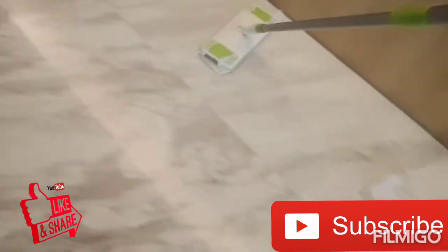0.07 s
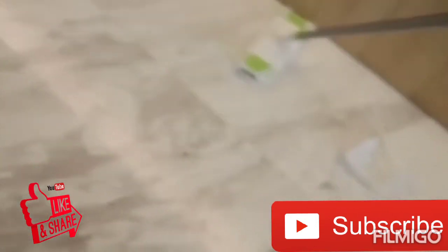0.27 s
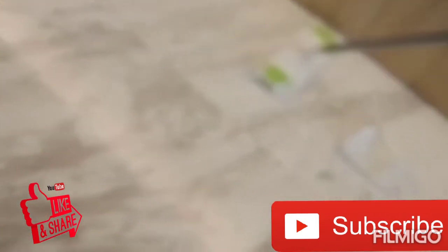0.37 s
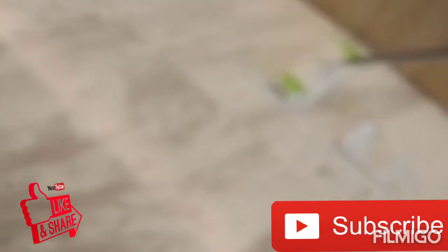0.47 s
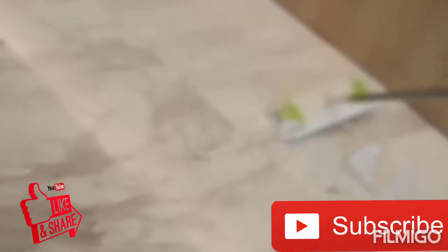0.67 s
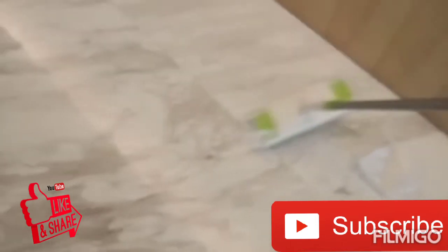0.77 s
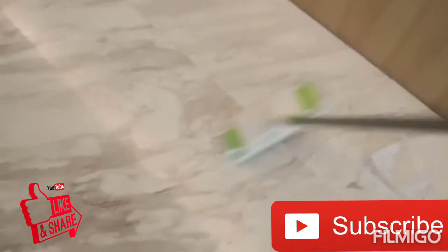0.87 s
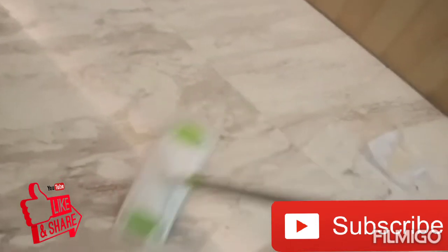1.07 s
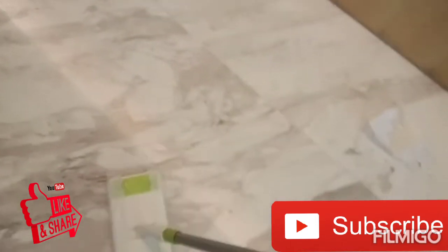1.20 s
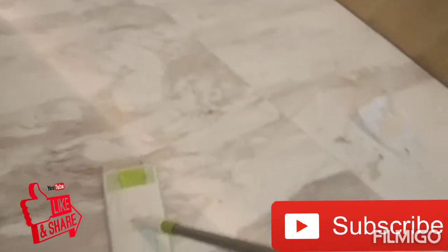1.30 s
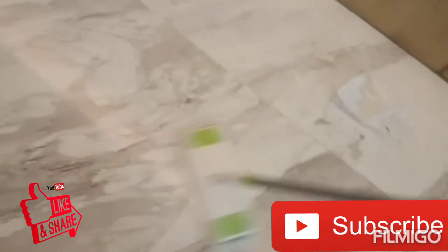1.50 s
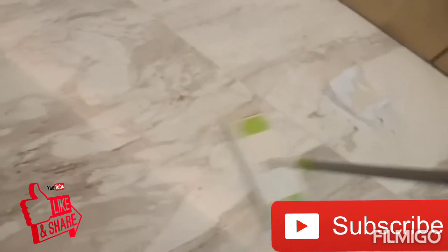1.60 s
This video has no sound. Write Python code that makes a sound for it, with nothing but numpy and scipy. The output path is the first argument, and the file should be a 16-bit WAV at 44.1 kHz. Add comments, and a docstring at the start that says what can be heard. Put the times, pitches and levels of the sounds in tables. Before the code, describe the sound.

Flat mop knocking on a hard floor, with plastic clacks, a quick rattle and faint swishes.

```python
"""Thuds and plastic clacks of a flat mop on a hard floor in a small room.
The padded head thuds down, the plate clacks, the swivel joint ticks and the pole taps against it;
then the head flips and lands in a quick rattle. The cloth swishes faintly between the knocks.
The room rings after each blow and hums with steady noise."""
import sys
import numpy as np
from scipy import signal
from scipy.fft import rfft, irfft, next_fast_len
from scipy.io import wavfile
from scipy.ndimage import uniform_filter1d

SR = 44100
rng = np.random.default_rng(int(sys.argv[2]) if len(sys.argv) > 2 else 0)


def dump_mix(stems):
    """Bounce the given channels to the path in sys.argv[1] as a 16-bit WAV at rate SR."""
    frames = np.atleast_2d(stems).T  # one column per channel
    limited = np.clip(frames, -1, 1)  # hard clip at full scale
    pcm = np.round(limited * 32767).astype(np.int16)
    wavfile.write(sys.argv[1], SR, pcm)


N = 72765
T = np.arange(N) / SR

# Spectrum of the crack in a clack or tap. Each row: frequency in Hz, relative level in dB.
CRACK_SPECTRUM = [(60, -31), (200, -13.5), (600, 0), (1300, -7), (2600, -1.5), (3500, -2), (4200, -10),
                  (4800, -24), (9000, -25), (16000, -33)]
# Spectrum of the joint's tick. Each row: frequency in Hz, relative level in dB.
TICK_SPECTRUM = [(500, -12), (2000, -8), (4000, 0), (6000, -1.5), (8500, 8), (10500, -12.5), (15500, -14)]
CRACK_T60_S, TICK_T60_S = 0.018, 0.022
TILT_PIVOT_HZ = 2000
RING_WET_DB = -8.5  # share of a part's own ring that reaches the room


def amp(db):
    """Decibels to gain."""
    return 10 ** (np.asarray(db) / 20)


def unit(x):
    """Scale to rms 1."""
    return x / np.sqrt(np.mean(x ** 2) + 1e-20)


def along(points, hz):
    """Read (Hz, value) points on a log axis."""
    points_hz, values = np.transpose(points)
    return np.interp(np.log(hz + 1), np.log(points_hz + 1), values)


def fade(t, t60_s):
    """Exponential decay, 60 dB down at t60_s."""
    return np.exp(-np.log(1000) * t / t60_s)


def colour(x, points):
    """Minimum-phase filter with the given (Hz, dB) gain."""
    size = next_fast_len(2 * len(x))
    gain = amp(along(points, np.fft.rfftfreq(size, 1 / SR)))
    cepstrum = irfft(np.log(gain), size)
    cepstrum[1:size // 2] *= 2
    cepstrum[size // 2 + 1:] = 0
    return irfft(rfft(x, size) * np.exp(rfft(cepstrum)), size)[:len(x)]


def noise(points):
    """Coloured noise of rms 1."""
    return unit(colour(rng.standard_normal(N), points))


def add(track, start_s, sound):
    """Mix a sound in at start_s."""
    i = round(start_s * SR)
    track[i:i + len(sound)] += sound[:N - i]


def burst(points, t60_s, tilt_db_oct=0):
    """Dying puff of coloured, tilted noise that starts near rms 1."""
    envelope = fade(T[:SR // 10], t60_s)
    tilted = [(hz, db + tilt_db_oct * np.log2(hz / TILT_PIVOT_HZ)) for hz, db in points]
    puff = colour(rng.standard_normal(len(envelope)) * envelope, tilted)
    return unit(puff) * np.sqrt(np.mean(envelope ** 2))


def struck(modes, attack_s, tilt_db_oct=0):
    """Short ring of a part's modes; a positive tilt brightens it."""
    t = T[:SR // 10]
    ring = np.zeros(len(t))
    for k, (hz, db, t60_s) in enumerate(modes):
        gain = (-1) ** k * amp(db + tilt_db_oct * np.log2(hz / TILT_PIVOT_HZ))
        ring += gain * np.sin(2 * np.pi * hz * t) * fade(t, t60_s)
    return ring * (1 - np.exp(-t / attack_s)) ** 2


def room_noise():
    """Steady low hum with a little hiss."""
    # Each row: frequency in Hz, relative level in dB.
    hum_spectrum = [(25, -31), (45, -12), (68, -2), (98, 1), (150, -9.5), (210, -7), (290, -8), (450, -17),
                    (700, -16), (1200, -25), (3000, -27.5), (5000, -31.5), (7000, -32), (8500, -25.5),
                    (10000, -38), (12500, -48), (15800, -41.5)]
    return amp(-52.5) * noise(hum_spectrum)


def room_tail(x):
    """Diffuse reverberation; each frequency dies at its own speed."""
    # Room decay. Each row: frequency in Hz, T60 in seconds.
    decay_times = [(100, 0.86), (280, 0.7), (700, 0.99), (2500, 0.66), (5000, 0.68), (12000, 0.45)]
    build_s = 0.001
    hz, t, spectra = signal.stft(rng.standard_normal(SR), SR, nperseg=256)
    spectra *= fade(t, along(decay_times, hz)[:, None])
    tail = signal.istft(spectra, SR, nperseg=256)[1][:SR]
    tail *= 1 - np.exp(-T[:SR] / build_s)
    return signal.fftconvolve(x, tail / np.linalg.norm(tail))[:N]


def room_ring(x):
    """Low room resonances, set off by blows near their pitch."""
    # Each row: frequency in Hz, relative level in dB, T60 in seconds.
    room_modes = [(205.6, -16.5, 0.56), (230.7, -27, 1), (275.4, -15.5, 0.99), (299.7, -19, 0.61),
                  (343, -52, 0.39), (364.4, -26.5, 0.92), (402.7, -33, 0.5), (432.4, -23.5, 0.88),
                  (462.4, -26, 1), (594, -28, 0.36), (595.3, -25.5, 0.99), (633, -24.5, 0.36),
                  (775, -16, 0.83), (856, -24, 0.45)]
    ring = sum(amp(db) * np.cos(2 * np.pi * hz * T) * fade(T, t60_s) for hz, db, t60_s in room_modes)
    return signal.fftconvolve(x, ring / np.linalg.norm(ring))[:N]


def cloth():
    """The pad swishes with a fine grain as it slides."""
    # Course of the slide. Each row: time in seconds, level in dB.
    slide_levels = [(0, -63.5), (.2, -64), (.4, -62.5), (.56, -58), (.62, -57.5), (.69, -59.5),
                    (.79, -55.5), (.87, -65.5), (1.1, -77), (1.2, -76), (1.42, -77), (1.52, -63),
                    (1.62, -59.5)]
    # Cloth friction. Each row: frequency in Hz, relative level in dB.
    swish_spectrum = [(300, -8), (1000, 5), (3000, 7.5), (5000, -7), (7000, 1.5), (8500, 12), (10000, 0.5),
                      (12500, -3), (15800, -3)]
    slide_db = np.interp(T, *np.transpose(slide_levels))
    grain_db = unit(uniform_filter1d(rng.standard_normal(N), size=200))
    return amp(slide_db + grain_db) * noise(swish_spectrum)


def pole():
    """The hollow pole taps its joint: a short pitched ring, a tick, a crack that scatters in the room."""
    # Each row: start in seconds, gain in dB.
    taps = [(.2478, -43.5), (.9184, -33.5)]
    # Each row: frequency in Hz, relative level in dB, T60 in seconds.
    pole_modes = [(656, -6, 0.022), (871, -7.5, 0.074), (1300, -13, 0.016), (1850, -9.5, 0.024),
                  (2398, 0.5, 0.026), (2667, 5, 0.011), (3660, 2.5, 0.016)]
    tick_offset_db, crack_direct_db, crack_wet_db = -18.5, -2, -1
    track = np.zeros(N)
    for start_s, db in taps:
        ring = amp(db) * struck(pole_modes, attack_s=0.00029)
        crack = amp(db) * burst(CRACK_SPECTRUM, CRACK_T60_S)
        tick = amp(db + tick_offset_db) * burst(TICK_SPECTRUM, TICK_T60_S)
        add(track, start_s, ring + amp(crack_direct_db) * crack + tick)
        add(track, start_s, room_tail(amp(RING_WET_DB) * ring + amp(crack_wet_db) * crack))
    return track


def clacks():
    """Plate clacks (crack and short ring) and joint ticks, some following one another within a few ms."""
    # Each row: start in seconds, clack and tick gains in dB, clack and tick tilts in dB per octave.
    contacts = [(0.2483, -49, -39, -0.5, -5), (0.2519, -59, -46, 7, 9), (0.2638, -43, -47, 3, 6.5),
                (.274, -40, -54, -0.5, 14), (0.5658, -39, -48, 0.5, -3), (.585, -45, -65, -4.5, 0),
                (1.1737, -32, -42.5, 0.5, 4), (1.178, -67, -43, 6, 14), (1.2208, -30, -51, -6, 5),
                (1.2283, -26, -35, -3, -11), (1.233, -36.5, -60, -15, -7),
                (1.2405, -37.5, -55, 2, 9), (1.2443, -29, -64, -2.5, -10),
                (1.2471, -26.5, -45, 1.5, -8.5), (1.2495, -24, -28, -3.5, -27),
                (1.2522, -34.5, -66, 1.5, -4), (1.2748, -37, -64, 0, -15)]
    # Each row: frequency in Hz, relative level in dB, T60 in seconds.
    plate_modes = [(593, -15, 0.042), (869, -16.5, 0.09), (1200, -12, 0.017), (1933, -7.5, 0.024),
                   (2500, -5, 0.018), (2890, -11.5, 0.024), (3460, -1.5, 0.019), (4165, -13.5, 0.015)]
    attack_s, ring_offset_db, crack_offset_db = 0.0003, -6.5, -4
    crack_wet_db, tick_wet_db = -4, -2.5
    track = np.zeros(N)
    for start_s, clack_db, tick_db, clack_db_oct, tick_db_oct in contacts:
        ring = amp(clack_db + ring_offset_db) * struck(plate_modes, attack_s, clack_db_oct)
        crack = amp(clack_db + crack_offset_db) * burst(CRACK_SPECTRUM, CRACK_T60_S, clack_db_oct)
        tick = amp(tick_db) * burst(TICK_SPECTRUM, TICK_T60_S, tick_db_oct)
        to_room = amp(RING_WET_DB) * ring + amp(crack_wet_db) * crack + amp(tick_wet_db) * tick
        add(track, start_s, ring + crack + tick)
        add(track, start_s, room_tail(to_room))
    return track


def thuds():
    """The padded head meets the floor; each soft blow swells, dies within a few cycles, stirs the room."""
    # Each row: start in seconds, envelope peak in dB, pitch in Hz, pad compression time in seconds.
    blows = [(.112, -43.5, 97, 0.0076), (.2458, -22.5, 356, 0.0021), (0.2503, -25.5, 208.6, 0.0047),
             (.2535, -23.5, 310, 0.0033), (.255, -37, 623, 0.0042), (0.2727, -30, 269, 0.0034),
             (.596, -55.5, 604, 0.0069), (1.157, -45, 363, 0.013), (1.2198, -26, 380, 0.0013),
             (1.23, -32.5, 343, 0.0015), (1.245, -31.5, 151, 0.0052), (1.2462, -21, 400.6, 0.0044),
             (1.253, -32.5, 231.4, 0.0056)]
    # The head comes closer, so less arrives via the room. Each row: time in seconds, room send in dB.
    room_sends = [(.25, 1), (1.25, -4.5)]
    # The room's answer to thuds. Each row: frequency in Hz, gain in dB.
    boom_curve = [(60, -22), (150, -9), (220, 6.5), (450, -4), (700, -2.5), (1200, 12), (3000, -23)]
    modes_wet_db, tail_wet_db = -15, -3.5
    direct, to_room, tail = np.zeros((3, N))
    t = T[:SR // 10]
    for start_s, db, hz, squeeze_s in blows:
        squeeze = t / squeeze_s
        envelope = squeeze * np.exp((1 - squeeze ** 2) / 2)
        blow = np.zeros(N)
        add(blow, start_s, amp(db) * envelope * np.sin(2 * np.pi * hz * t))
        send = amp(np.interp(start_s, *np.transpose(room_sends)))
        direct += blow
        to_room += send * blow
        tail += send * room_tail(blow)
    return direct + amp(modes_wet_db) * room_ring(to_room) + amp(tail_wet_db) * colour(tail, boom_curve)


def scene():
    """The mop over the steady noise of the room, mono."""
    return (thuds() + clacks() + pole() + cloth() + room_noise())[None]


def record(dry):
    """The microphone loses the deep bass; the top treble is cut off."""
    low_hz, top_hz = 76, 15850
    thinned = signal.sosfilt(signal.butter(2, low_hz, 'high', fs=SR, output='sos'), dry)
    size = next_fast_len(2 * N)
    passband = np.fft.rfftfreq(size, 1 / SR) < top_hz
    return irfft(rfft(thinned, size) * passband, size)[..., :N]


dry = scene()
out = record(dry)
dump_mix(out)
```